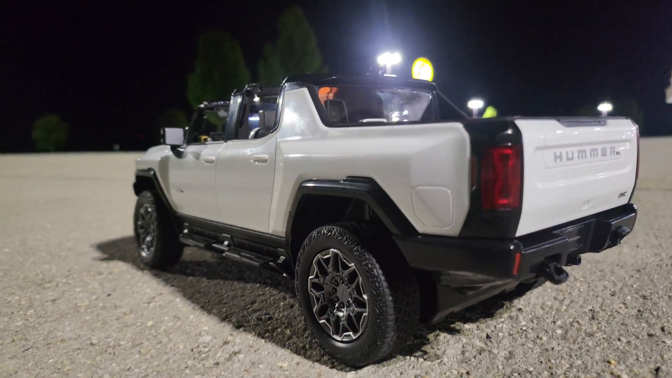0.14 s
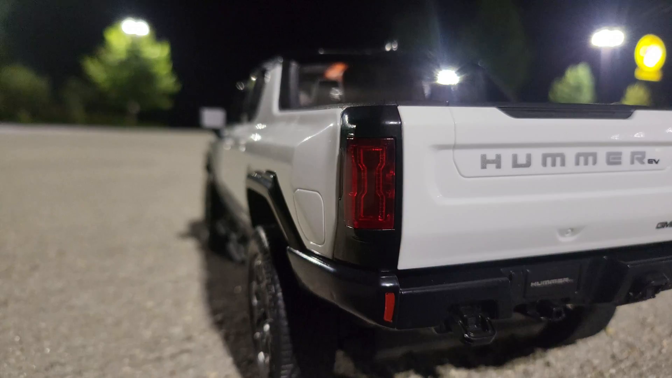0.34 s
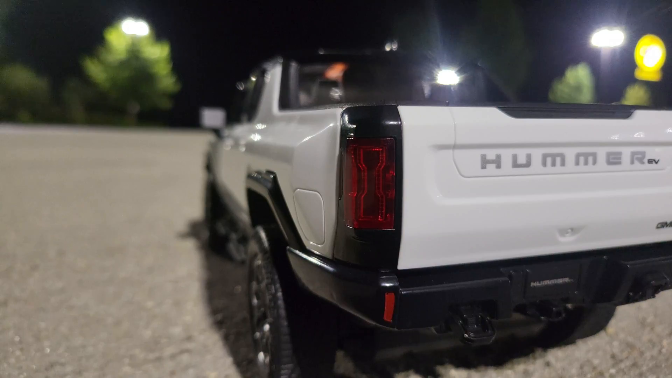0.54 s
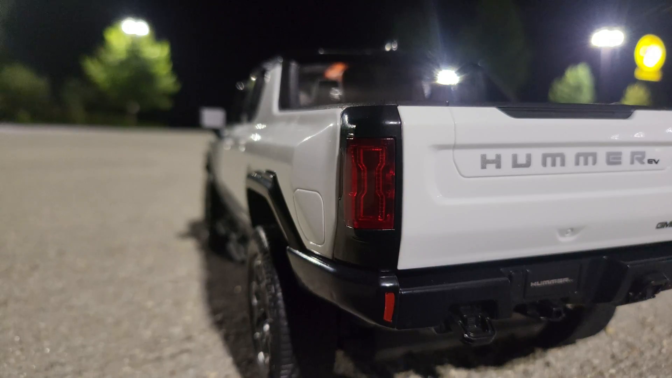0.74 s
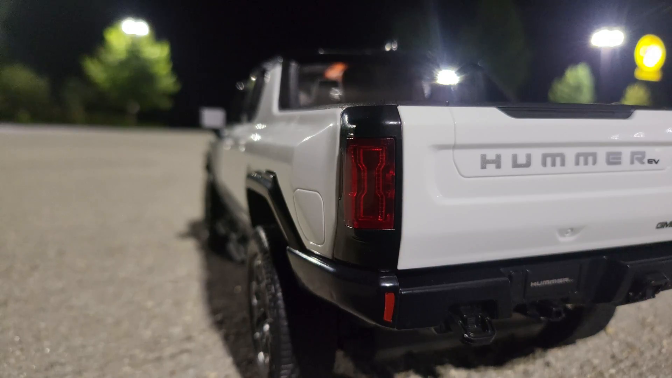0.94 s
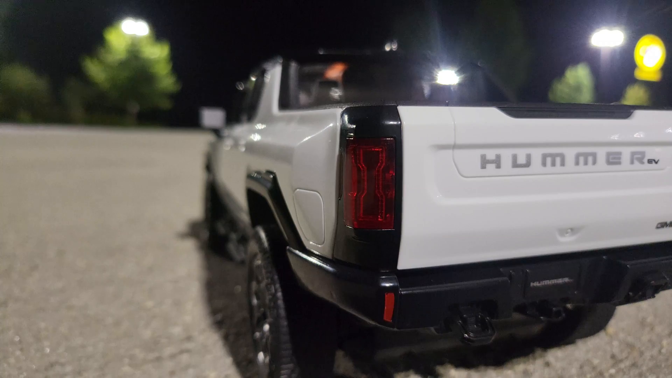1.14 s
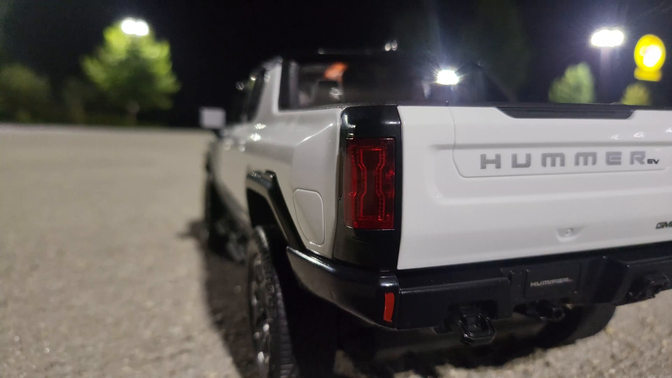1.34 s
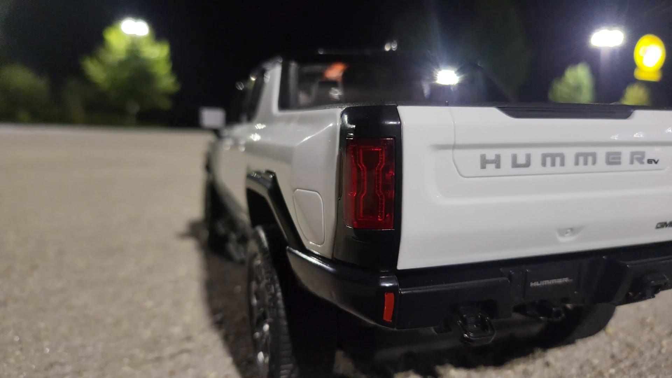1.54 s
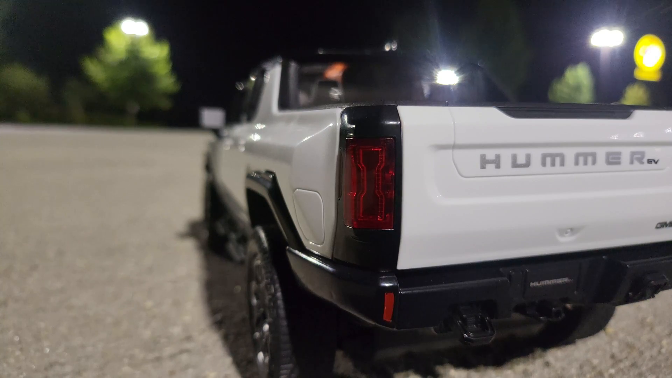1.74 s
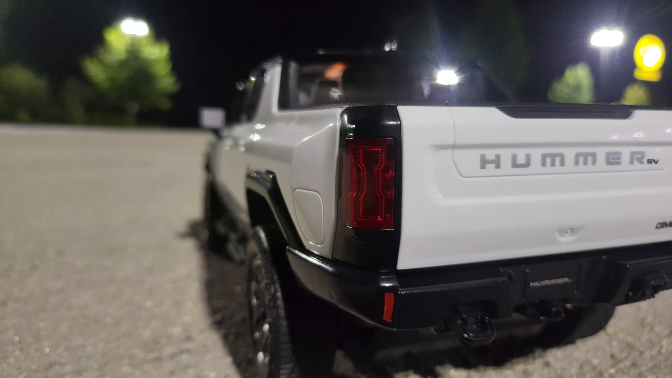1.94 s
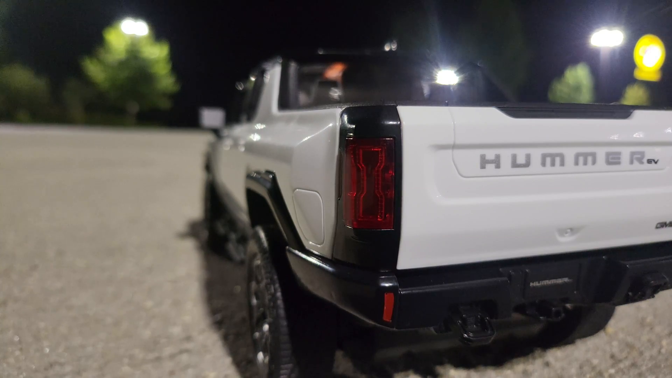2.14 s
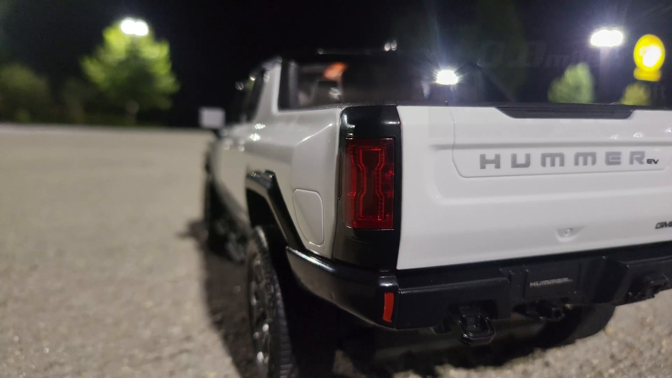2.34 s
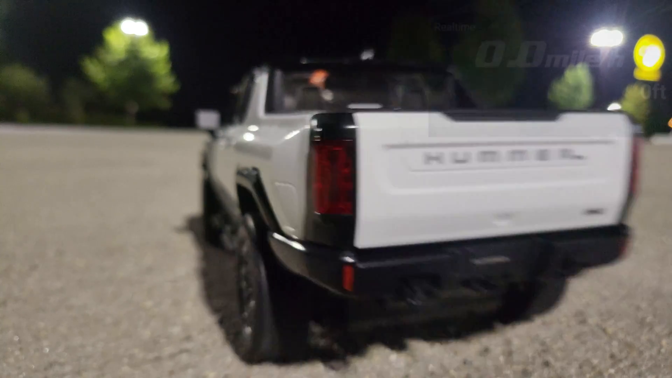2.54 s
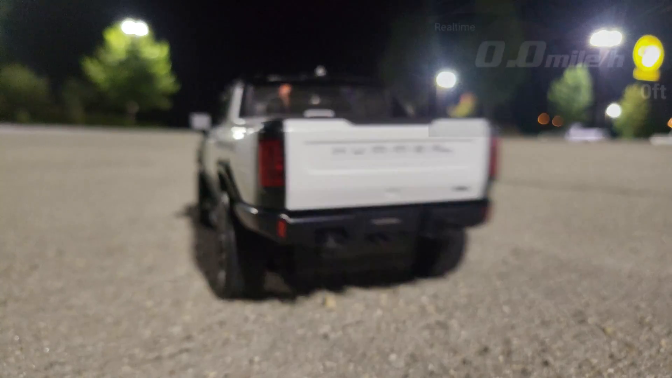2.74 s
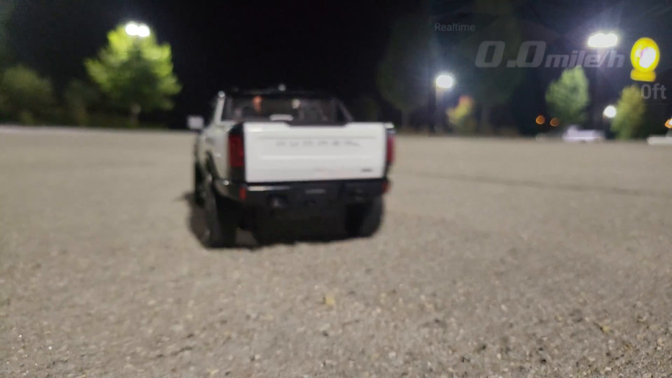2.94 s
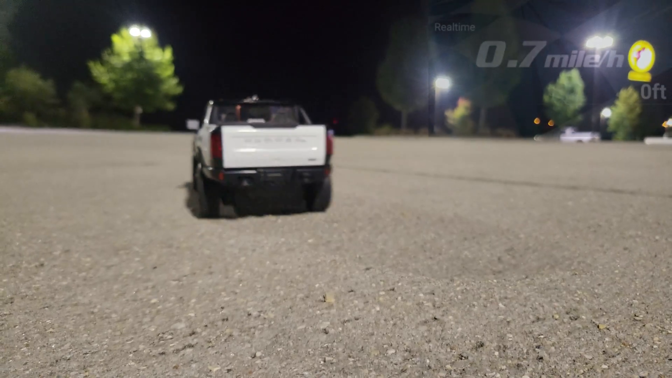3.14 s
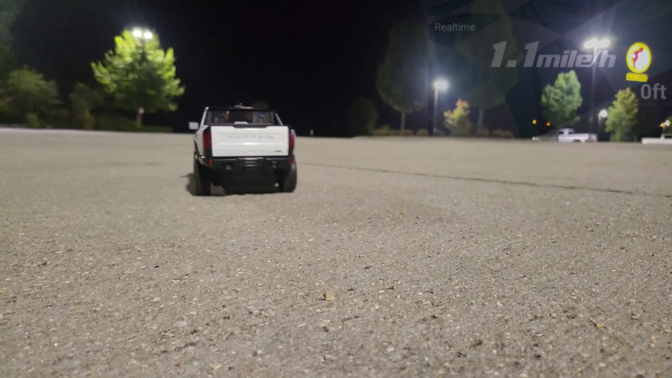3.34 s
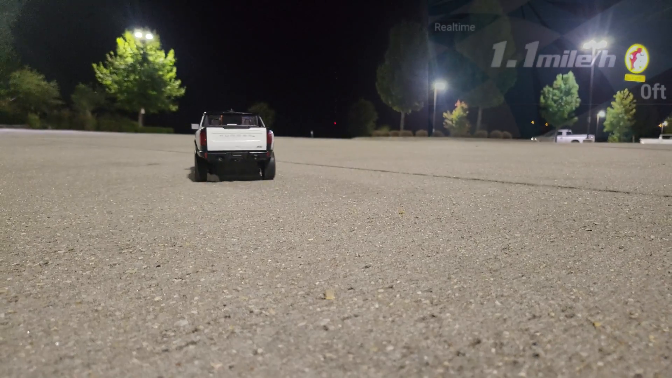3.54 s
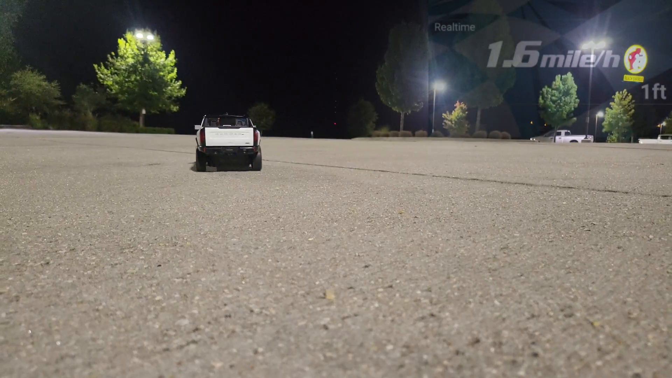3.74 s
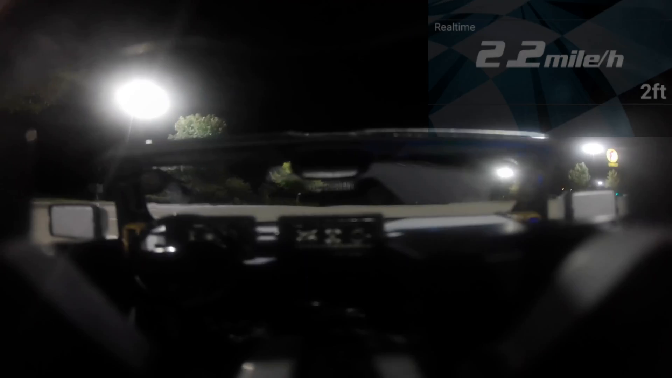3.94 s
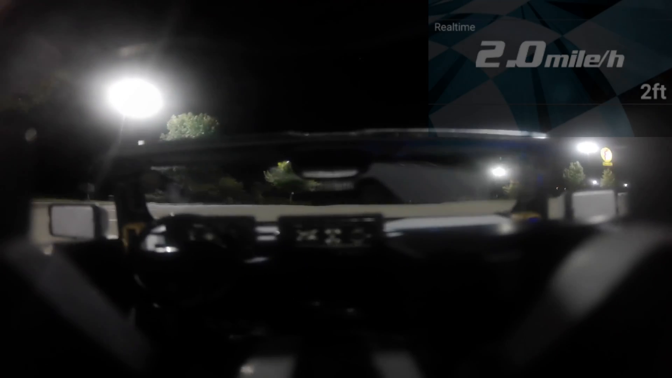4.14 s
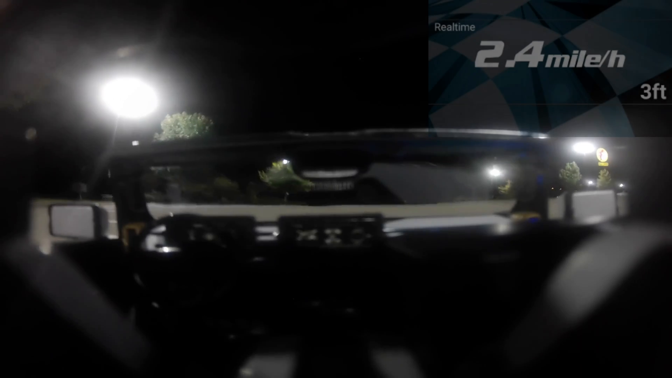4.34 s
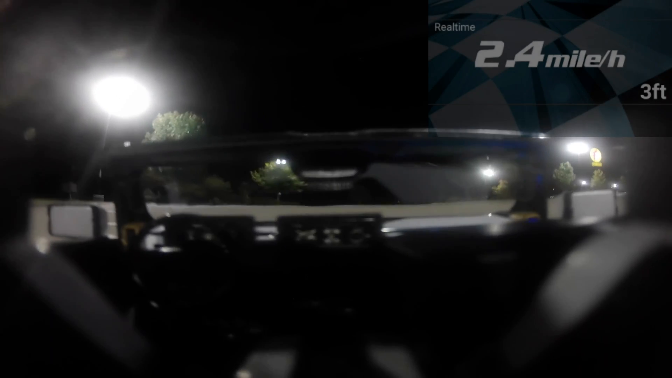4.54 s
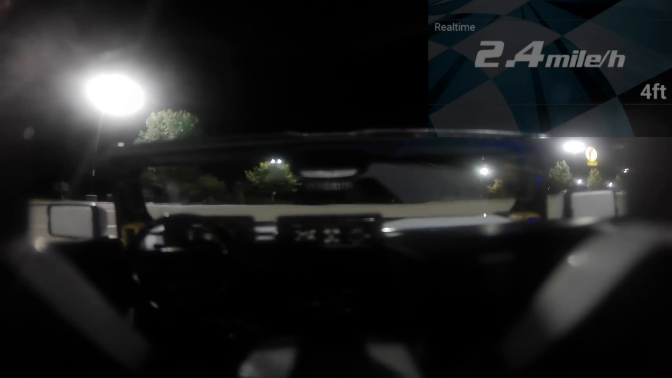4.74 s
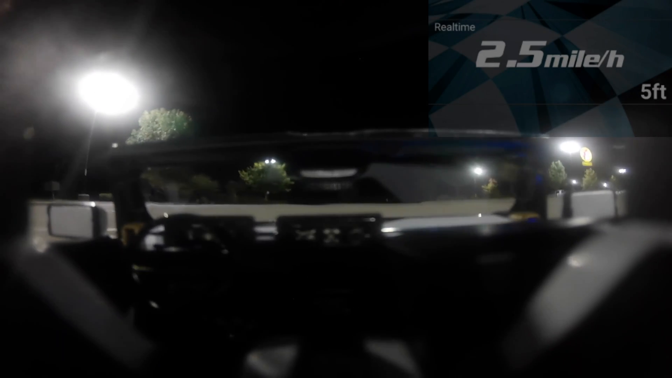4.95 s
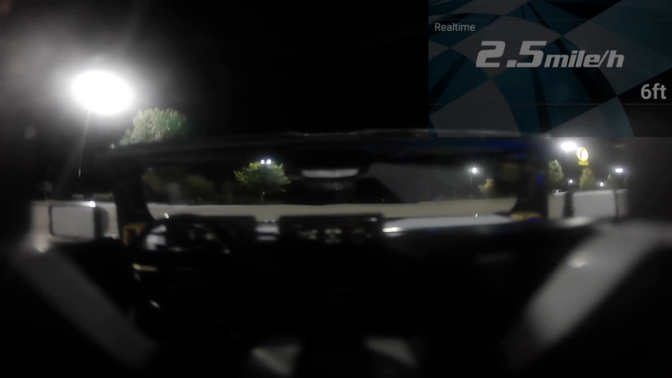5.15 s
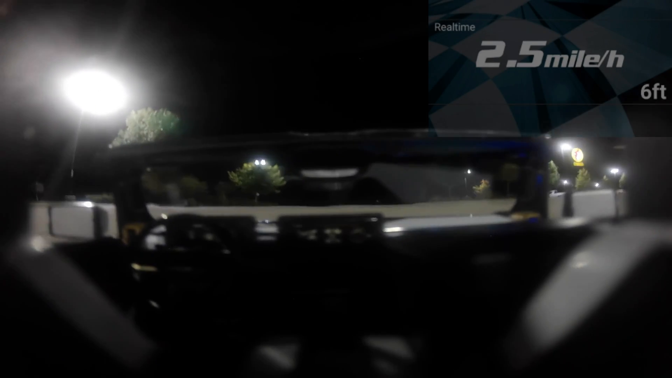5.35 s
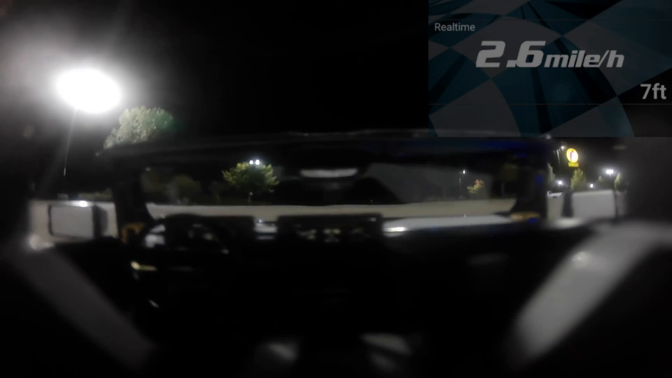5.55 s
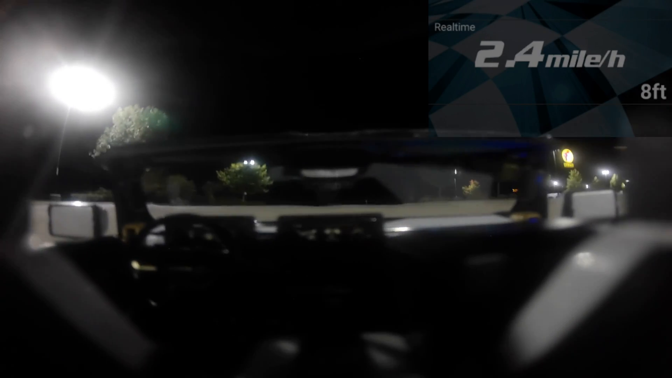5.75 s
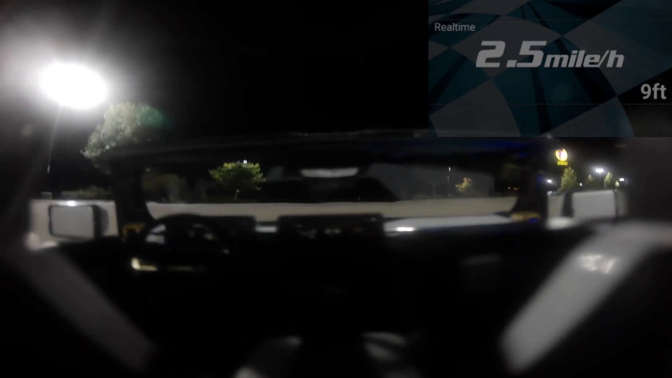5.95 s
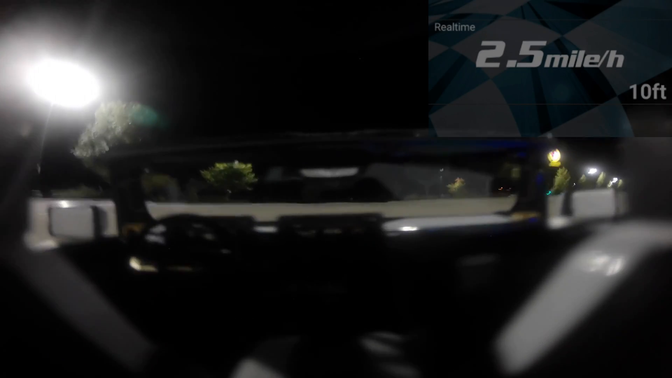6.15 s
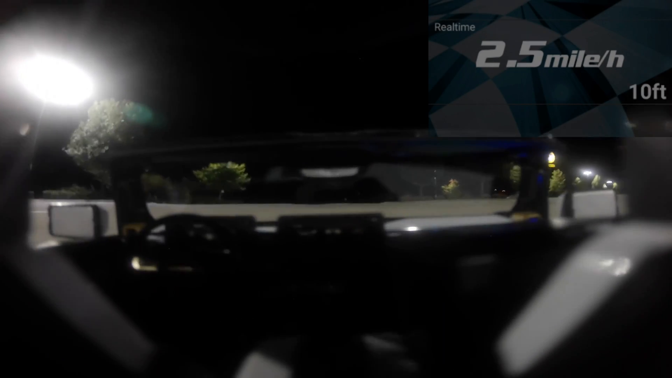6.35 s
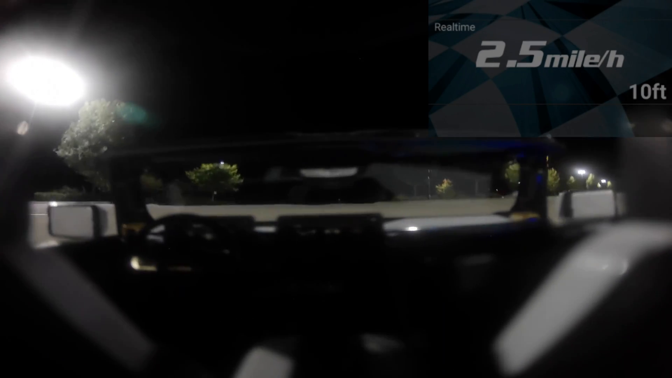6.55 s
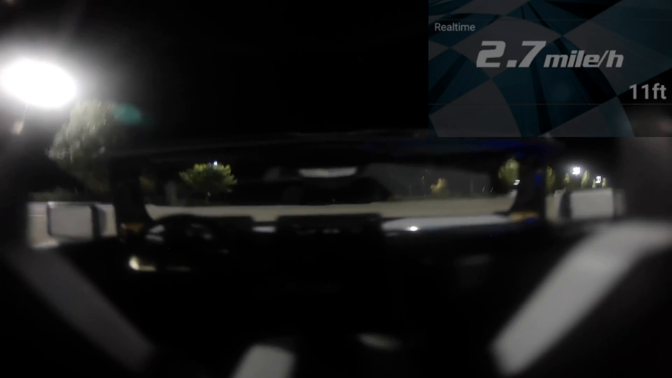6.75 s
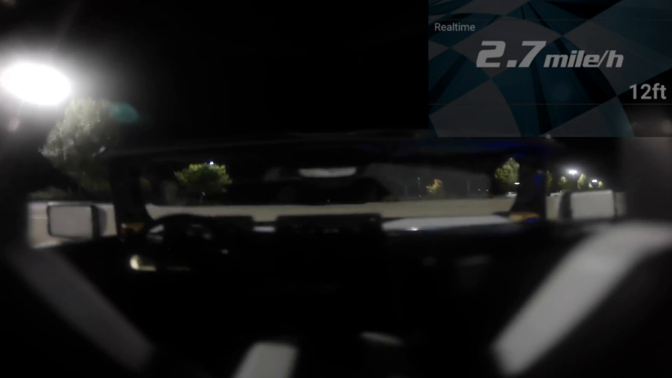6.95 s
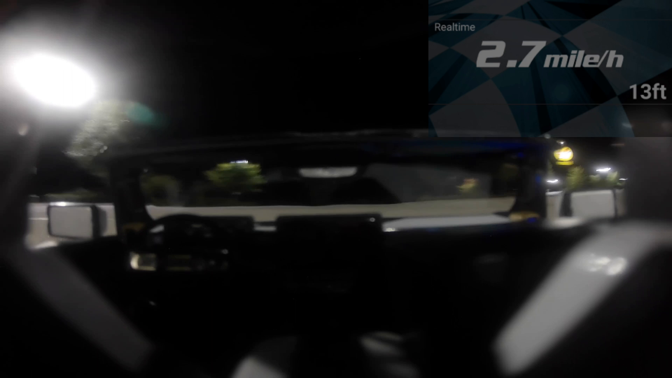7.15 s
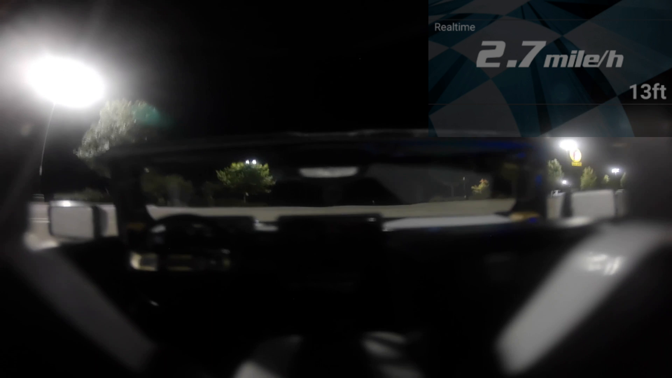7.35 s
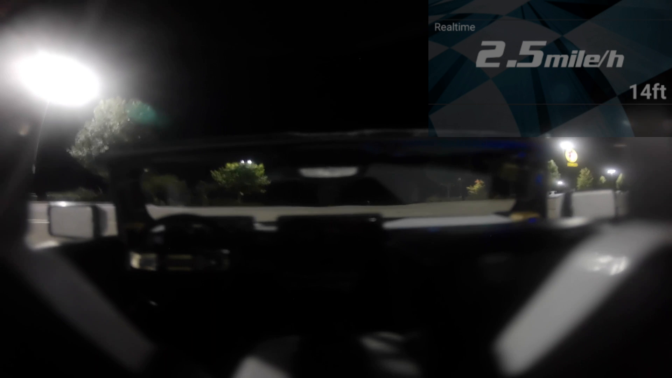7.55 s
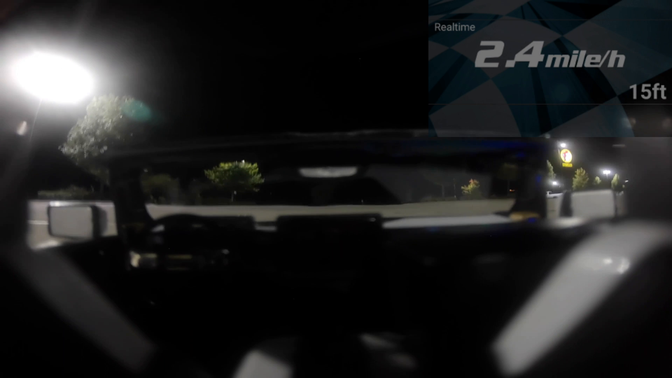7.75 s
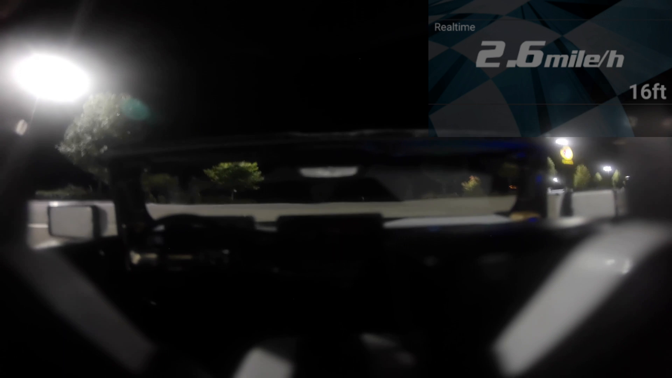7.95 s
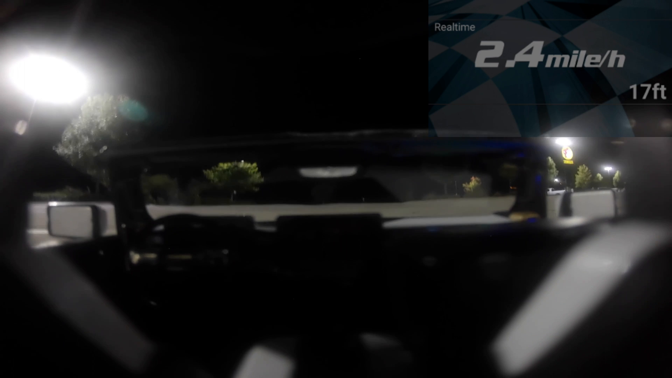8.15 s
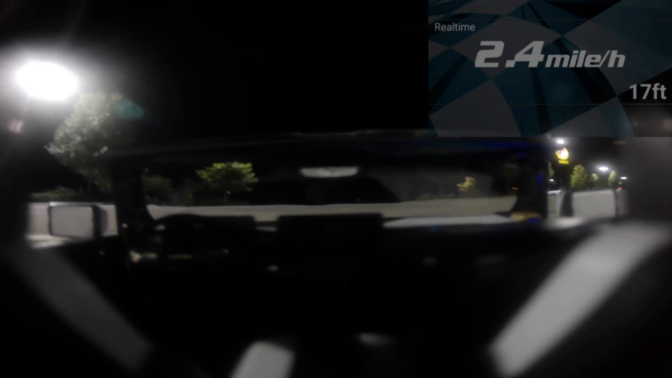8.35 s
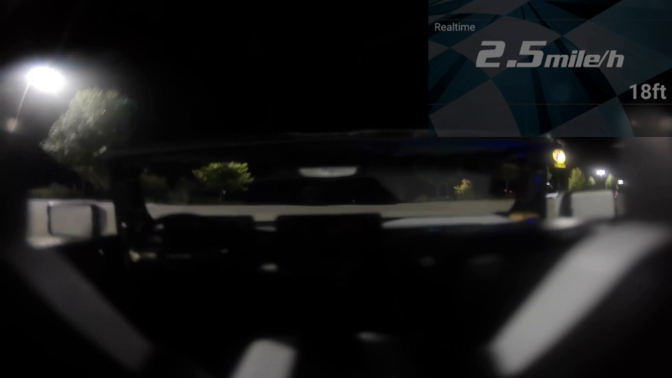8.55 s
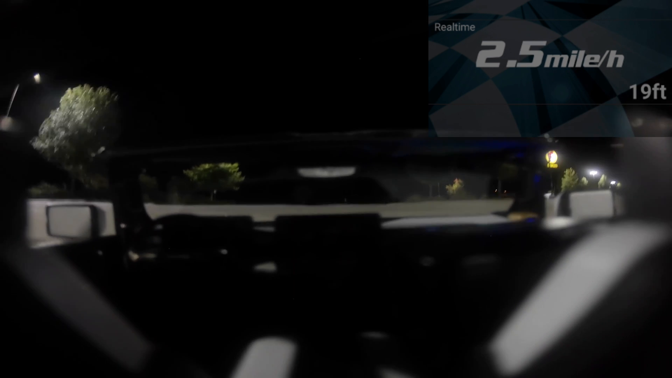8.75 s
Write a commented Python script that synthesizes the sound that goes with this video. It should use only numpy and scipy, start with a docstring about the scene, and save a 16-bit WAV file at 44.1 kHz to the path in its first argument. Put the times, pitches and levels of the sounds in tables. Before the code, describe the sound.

Quiet night lot hum, then a toy vehicle's electric motor starts with a clack, climbs quickly, and grinds along close up with snapping grit.

```python
"""On an empty asphalt lot at night, with a low hum and a faint hiss, a radio-controlled toy truck waits. First
comes a moment of other background sound, then a tiny silence, then the lot: shaped noise and steady tones. The
motor starts: gear tones, knocks and scraping noise ring through filters that act as the plastic body. The tyres
rumble as low noise and grit snaps as short noise puffs. Shaft speed sets the pitch of the gears and the level
of the gears and tyres. From 3.6 s the lot's hum and hiss fade away and the stereo image narrows."""
import sys
import numpy as np
from scipy.fft import rfft, irfft, next_fast_len
from scipy.io import wavfile
from scipy.ndimage import uniform_filter1d, map_coordinates

SR = 44100
rng = np.random.default_rng(int(sys.argv[2]) if len(sys.argv) > 2 else 0)


def wrap_up_sound(samples):
    """Save the sound to the file named by the first command line argument, as 16-bit audio."""
    columns = np.atleast_2d(samples).T
    # keep every value between -1 and 1, then stretch to whole-number steps
    tamed = np.clip(columns, -1, 1)
    steps = np.round(tamed * 32767).astype(np.int16)
    wavfile.write(sys.argv[1], SR, steps)


N = 392490
TIME = np.arange(N) / SR  # seconds

# Background of the opening moment. Each row: frequency in Hz, relative level in dB.
OPENING_SPECTRUM = [(25, -3.5), (200, -5), (300, -19), (1350, -19), (1700, -33.5), (7800, -43.5),
                    (8600, -80)]
# Low machine hum of the lot. Each row: frequency in Hz, relative level in dB.
LOT_HUM_SPECTRUM = [(12, -30), (20, -16), (54, -5), (78, -2.5), (92, -16.5), (129, -9), (210, -16.5),
                    (280, -26), (360, -61), (620, -120)]
# Faint hiss of the lot. Each row: frequency in Hz, relative level in dB.
LOT_HISS_SPECTRUM = [(150, -22), (280, 2), (500, 1.5), (900, -3.5), (1450, -10.5), (3100, -14),
                     (3700, -19.5), (4700, -21.5), (6000, -35.5), (7500, -37.5), (9000, -44), (15500, -34)]
# Steady tones in the hum. Each row: frequency in Hz, relative level in dB.
HUM_TONES = [(37.7, -42.5), (145.3, -49.5), (174.8, -53.5), (204.3, -46.5), (232.5, -51.5)]
# Two close tones that beat into a faint flutter. Each row: frequency in Hz, relative level in dB.
FLUTTER_TONES = [(1981, -62.5), (2040, -60.5)]
# Tyre rumble. Each row: frequency in Hz, relative level in dB.
TYRE_SPECTRUM = [(18, -42), (30, -6.5), (54, -11), (79, -3.5), (103, 1.5), (146, -3.5), (243, -1),
                 (346, -9.5), (550, -10.5), (720, -17.5), (1210, -120)]
# Coarse patches of asphalt. Each row: centre in seconds, half length in seconds, extra roughness in dB.
COARSE_PATCHES = [(3.77, 0.14, 0.5), (6.338, 0.21, 4.5), (7.453, 0.085, 3.5), (7.73, 0.086, 6.5),
                  (8.152, 0.18, 3.5)]
# Colour of a grit snap. Each row: frequency in Hz, relative level in dB.
GRIT_SPECTRUM = [(3000, -34), (5500, 1.5), (7300, 4), (9500, -4.5), (12000, -2), (13500, -11), (15500, -1),
                 (17000, -12.5)]
# Largest bits of grit that hit the body. Each row: start in seconds, relative peak in dB.
GRIT_SNAPS = [(3.0795, -11), (3.351, -10), (3.8663, -14), (4.1666, -10), (4.2694, -11), (4.5886, -8),
              (5.254, -6), (5.3514, -5), (6.2144, -7), (6.2992, -1), (6.4026, -3), (6.4927, -7.5),
              (6.607, -2), (6.9328, -10), (7.055, -5), (7.363, -8), (7.3935, -6.5), (7.4978, -7),
              (7.6819, -7), (8.659, -9)]
# Pebbles cracking as the wheels first bite. Each row: start in seconds, relative peak in dB.
PEBBLE_CRACKS = [(2.7238, -12), (2.7666, -17), (2.8713, -11), (2.8888, -7), (2.8995, -7), (2.9148, -1),
                 (3.154, -8.5)]
# Gears taking up their slack. Each row: start in seconds, relative peak in dB.
SLACK_CLACKS = [(2.437, -12.5), (2.46, -7.5), (2.486, -11)]
# Gear shaft speed. Each row: time in seconds, speed in turns per second.
SHAFT_SPEED = [(2.45, 6.0), (2.7, 16.0), (2.9, 21.7), (3.2, 27.0), (3.5, 30.3), (3.8, 32.8), (4.15, 36.2),
               (4.7, 37.7), (5.0, 38.1), (5.4, 37.9), (5.9, 39.4), (6.3, 39.2), (6.8, 38.1), (7.2, 38.2),
               (7.5, 38.3), (7.9, 38.5), (8.3, 37.6), (8.9, 38.1)]
# Gear tones. Each row: multiple of shaft speed, width in multiples, relative dB, extra dB at full torque.
GEAR_TONES = [(18, 2, -15, 0), (23.1, 1.4, 0, -4), (34.3, 2.1, -15, 16), (45.6, 4, -6, 13)]
# Off-centre gears press harder once a turn. Each row: multiple of shaft speed, relative depth in dB.
OFF_CENTRE_GEARS = [(.5, 1.2), (1, 1.8), (1.25, 1.1), (2.87, .7), (3, 1.3), (4, 1.0), (6, .7), (7, .8),
                    (11, .7)]
# Body shell resonances. Each row: frequency in Hz, width in Hz, relative level in dB.
SHELL_MODES = [(420, 110, -14), (729, 200, 1), (1042, 457, 2.5), (1330, 204, -1.5), (1980, 380, -19)]
# Gear housing resonances. Each row: frequency in Hz, width in Hz, relative level in dB.
HOUSING_MODES = [(2701, 532, -0.5), (3626, 260, -6.5), (4005, 885, -5), (5750, 420, -12), (6650, 2870, -14),
                 (11300, 7600, -29.5)]
# Thin metal rings of the motor. Each row: frequency in Hz, width in Hz, relative level in dB.
MOTOR_MODES = [(9950, 170, 6.5), (10370, 560, 3), (11740, 500, 5.5), (12400, 250, -19)]
# Axle resonances, for labouring at low speed. Each row: frequency in Hz, width in Hz, relative level in dB.
AXLE_MODES = [(980, 150, 0), (1270, 310, -6)]
# Wide stereo image at first. Each row: frequency in Hz, side level minus middle level in dB.
EARLY_WIDTH = [(60, -35), (180, -16), (550, -31.5), (1650, -10.5), (4970, -11.5), (15000, -8.5)]
# Narrow stereo image later on. Each row: frequency in Hz, side level minus middle level in dB.
LATE_WIDTH = [(60, -66), (130, -71), (290, -56), (640, -56), (1410, -66.5), (3100, -23), (6820, -13),
              (15000, -6)]

OPENING_END_S, LOT_START_S, DRIVE_START_S = .225, .248, 2.458
FADE_S, FADE_DB_PER_S = 3.6, 187  # when the lot and the wide stereo image start to fade, and how fast
HUM_DB, HISS_DB = -36, -42  # relative levels within the lot
CRUISE = 38  # shaft turns per second when cruising
# Layers of the drive: relative level at cruising speed in dB, growth in dB per doubling of speed
WHINE_DB, WHINE_GROWS_DB = -14.5, 7.5
RATTLE_DB, RATTLE_GROWS_DB = -17, 11
RUMBLE_DB, RUMBLE_GROWS_DB = -25, 3.5
GRIT_DB, GRIT_GROWS_DB = -30, 6
SLIDING_DB, SLIDING_GROWS_DB = 1, 0  # tooth friction relative to tooth strikes
# Gain in shaft speed, in turns per second each second, where torque sets in and where it is full
COAST_ACCEL, FULL_ACCEL = 4.5, 12.7
TORQUE_DB = 2.5  # the whine is this much louder at full torque
LABOUR_DB = 0  # axle ring relative to the gear knocks, at standstill and full torque
THROB_DB = 1.3  # swing of the gear tones, once a turn, ahead of the other level changes
BACKLASH = 0.29  # extra swing of tooth pressure at standstill, as a share of the cruising swing
SNAP_DB, KNOCK_DB = 5.5, 4.5  # gain of the large snaps; gain of the housing's knock in every grit hit
TOP_HZ = 15950  # upper band limit of the recorder


def amp(db):
    """Turn decibels into gain."""
    return 10 ** (np.asarray(db) / 20)


def unit(x):
    """Scale a signal to an average strength (rms) of 1."""
    return x / np.sqrt(np.mean(x ** 2) + 1e-20)


def wobble(rate):
    """Draw a smooth random curve of rms 1 with rate random points a second."""
    points = rng.standard_normal(int(N * rate / SR) + 4)
    return unit(map_coordinates(points, [TIME * rate]))


def along(points, hz):
    """Read (Hz, value) points on a logarithmic frequency axis."""
    f, v = np.transpose(points)
    return np.interp(np.log(hz + 1), np.log(f + 1), v)


def shape(points):
    """Turn a (Hz, dB) spectrum into a function giving gain at any frequency."""
    return lambda hz: amp(along(points, hz))


def resonances(modes):
    """Give the gain against frequency of a set of steep-sided resonances."""
    def gain(hz):
        peaks = (amp(db) / (1 + (2 * (hz - centre) / width) ** 2) for centre, width, db in modes)
        return np.sqrt(sum(peak ** 2 for peak in peaks))
    return gain


def ring(x, gain):
    """Pass x through a filter with this gain that responds only after each push."""
    m = 2 * next_fast_len(N // 2 + 8192)
    log_gain = np.log(np.maximum(gain(np.fft.rfftfreq(m, 1 / SR)), 1e-6))
    # Folding the cepstrum onto positive times gives the minimum-phase filter.
    cepstrum = irfft(log_gain)
    cepstrum[1:m // 2] *= 2
    cepstrum[m // 2 + 1:] = 0
    return irfft(rfft(x, m) * np.exp(rfft(cepstrum)), m)[:N]


def noise(points):
    """Make noise of rms 1 with a given spectrum."""
    return unit(ring(rng.standard_normal(N), shape(points)))


def bursts(rows, t60):
    """Place a noise puff for each (s, peak dB) row; it dies by 60 dB in t60 seconds."""
    out = np.zeros(N + SR)
    t = np.arange(SR // 10) / SR
    for start, db in rows:
        puff = rng.standard_normal(len(t)) * amp(-60 * t / t60)
        out[round(start * SR):][:len(t)] += amp(db) * puff / np.abs(puff).max()
    return out[:N]


def impacts(rate, scatter, spread_db):
    """Make pulses of random size and sign at a moving rate, scattered by a share of their period."""
    count = np.cumsum(rate) / SR
    k = np.arange(1, int(count[-1]))
    late, size, side = rng.standard_normal((N // 8, 3))[:len(k)].T
    at = np.interp(k + scatter * late, count, np.arange(N)).astype(int)
    pulse = np.sign(side) * amp(spread_db * np.clip(size, -2, 2))
    return np.bincount(at, pulse, N)


def ports(x, lag):
    """Let two close microphone ports hear the same sound, the left one lag seconds later."""
    m = next_fast_len(N + 8192)
    half = np.pi * np.fft.rfftfreq(m, 1 / SR) * lag
    return irfft(rfft(x, m) * np.exp(1j * np.array([-half, half])), m)[:, :N]


def ambient(points, direct):
    """Mix noise from the right (direct is its share of power) with noise from all around."""
    share = np.clip(direct, 0, .7)
    around = np.array([noise(points), noise(points)])
    from_right = ports(noise(points), lag=0.000394)
    return np.sqrt(share) * from_right + np.sqrt(1 - share) * around


def opening():
    """Play a short stretch of background noise that stops at once."""
    return amp(-31.0) * ambient(OPENING_SPECTRUM, direct=0.42) * (TIME < OPENING_END_S)


def early_share():
    """Give the gain of the early part: 1 at first, then fading fast after 3.6 s."""
    return amp(-FADE_DB_PER_S * np.maximum(TIME - FADE_S, 0))


def steady_tone(hz, db):
    """Sound a hum tone whose level and phase waver slightly."""
    level = amp(db + 0.67 * wobble(5.02)) * np.sqrt(2)
    return level * np.sin(2 * np.pi * hz * TIME + .5 * wobble(6.3))


def lot():
    """Mix machine hum, its tones and a faint hiss; all fade out after 3.6 s."""
    tones = sum(steady_tone(hz, db) for hz, db in HUM_TONES + FLUTTER_TONES)
    hum = amp(HUM_DB) * noise(LOT_HUM_SPECTRUM) + tones
    hiss = amp(HISS_DB) * ambient(LOT_HISS_SPECTRUM, direct=0.57)
    return amp(3) * early_share() * (ports(hum, lag=.0001) + hiss)


def speed_db(speed, grows_db):
    """Give the level relative to cruising: grows_db for each doubling of speed."""
    return grows_db * np.log2(speed / CRUISE)


def coarseness():
    """Give the extra roughness in dB as the wheels roll onto each coarse patch and off again."""
    return sum(db * np.exp(-((TIME - s) / half) ** 2) for s, half, db in COARSE_PATCHES)


def grit_hits(rows):
    """Let each (s, dB) bit of grit snap against the body and knock the housing."""
    snaps = ring(bursts(rows, t60=0.017), shape(GRIT_SPECTRUM))
    knocks = ring(bursts(rows, t60=0.045), resonances(HOUSING_MODES))
    return snaps + amp(KNOCK_DB) * knocks


def tyres(speed):
    """Rumble the tread over asphalt and throw up small grit, both louder on coarse ground."""
    coarse_db = coarseness()
    rumble_db = RUMBLE_DB + speed_db(speed, RUMBLE_GROWS_DB) + coarse_db + 1.1 * wobble(25)
    grit_db = GRIT_DB + speed_db(speed, GRIT_GROWS_DB) + 1.06 * coarse_db
    when, size = rng.random(size=(900, 2)).T
    ticks = np.column_stack([when * N / SR, -24 * np.sqrt(size)])  # many small, few large
    return amp(rumble_db) * noise(TYRE_SPECTRUM) + amp(grit_db) * unit(grit_hits(ticks))


def stones():
    """Fling larger grit at the body and crack pebbles under the wheels."""
    crack_shape = shape([(1500, -18), (4000, 0), (8000, 1.0), (16000, -2)])
    cracks = ring(bursts(PEBBLE_CRACKS, t60=0.0052), crack_shape)
    return amp(SNAP_DB) * grit_hits(GRIT_SNAPS) + amp(4.5) * cracks


def slack_clacks():
    """Clack the gears together as they take up their slack."""
    clack_shape = shape([(200, -21), (1300, 10.0), (2500, 0.0), (5000, -4.5), (8000, -25)])
    return amp(1.5) * ring(bursts(SLACK_CLACKS, t60=0.099), clack_shape)


def motor_torque(speed):
    """Give torque from 0 to 1, high while the truck gathers speed."""
    accel = uniform_filter1d(np.gradient(speed) * SR, size=SR // 3)
    return np.clip((accel - COAST_ACCEL) / (FULL_ACCEL - COAST_ACCEL), 0, 1)


def tooth_load(speed):
    """Swing the tooth pressure as gears turn, the other gears at random angles to the shaft."""
    turns = np.cumsum(speed) / SR
    return sum(db * np.cos(2 * np.pi * (k * turns + rng.random() * (k != 1)))
               for k, db in OFF_CENTRE_GEARS)


def fuzzy_tone(turns, multiple, width):
    """Lock a tone to the shaft while its strength and phase wander from turn to turn."""
    a, b = (map_coordinates(knots, [turns * 2 * width]) for knots in rng.standard_normal((2, 4096)))
    angle = 2 * np.pi * multiple * turns
    return a * np.cos(angle) + b * np.sin(angle)


def whine(speed, torque, load_db):
    """Ring gear tones and knocks in the shell; torque changes the tones and rings the axle."""
    turns = np.cumsum(speed) / SR
    throb = amp(THROB_DB * np.cos(2 * np.pi * turns))
    mesh = sum(amp(db + extra_db * torque) * fuzzy_tone(turns, k, width)
               for k, width, db, extra_db in GEAR_TONES)
    tones = throb * speed ** 2 * mesh
    knocks = impacts(69 * speed, scatter=1.5, spread_db=2) / np.sqrt(speed)
    labour = torque * np.maximum(1 - speed / CRUISE, 0)
    axle = amp(LABOUR_DB) * labour * unit(ring(rng.standard_normal(N), resonances(AXLE_MODES)))
    shell = resonances(SHELL_MODES)
    sound = amp(-3.4) * unit(ring(tones, shell)) + unit(ring(knocks, shell)) + axle
    return unit(sound * amp(.68 * load_db))


def rattle(speed, load_db):
    """Strike and slide the teeth to ring the housing; at speed the motor's metal sings too."""
    strikes = unit(impacts(23 * speed, scatter=.5, spread_db=2.5) / np.sqrt(speed))
    sliding = amp(SLIDING_DB + speed_db(speed, SLIDING_GROWS_DB)) * rng.standard_normal(N)
    force = (strikes + sliding) * amp(.75 * load_db)
    singing = amp(-19) * (speed / speed.max()) ** 2 * unit(ring(force, resonances(MOTOR_MODES)))
    return unit(ring(force, resonances(HOUSING_MODES))) + singing


def gearbox(speed):
    """Whine and rattle louder with speed and on coarse ground; slow gears swing more in level."""
    torque, coarse_db = motor_torque(speed), coarseness()
    load_db = tooth_load(speed) * (1 + BACKLASH * (1 - speed / CRUISE))
    whine_db = WHINE_DB + speed_db(speed, WHINE_GROWS_DB) + TORQUE_DB * torque + 0.17 * coarse_db
    rattle_db = RATTLE_DB + speed_db(speed, RATTLE_GROWS_DB) + 0.17 * coarse_db + 0.43 * wobble(8)
    return amp(whine_db) * whine(speed, torque, load_db) + amp(rattle_db) * rattle(speed, load_db)


def spread(x):
    """Add a slightly late copy, opposite in the two channels; the image narrows after 3.6 s."""
    late, share = np.roll(x, SR // 700), early_share()
    side = share * ring(late, shape(EARLY_WIDTH)) + (1 - share) * ring(late, shape(LATE_WIDTH))
    return np.array([x + side, x - side])


def scene():
    """Play the opening, a tiny silence, then the lot where the truck waits and drives off."""
    times, turns_per_s = np.transpose(SHAFT_SPEED)
    speed = np.interp(TIME, times, turns_per_s)
    driving = (gearbox(speed) + tyres(speed)) * (TIME > DRIVE_START_S)
    truck = slack_clacks() + driving + stones()
    return opening() + lot() * (TIME > LOT_START_S) + spread(truck)


def record(dry):
    """Round off the highest peaks as the recorder does, and drop all above its band limit."""
    held = dry / (1 + np.abs(dry) ** 8) ** (1 / 8)
    m = next_fast_len(N + 8192)
    in_band = np.fft.rfftfreq(m, 1 / SR) < TOP_HZ
    return irfft(rfft(held, m) * in_band, m)[:, :N]


dry = scene()
out = record(dry)
wrap_up_sound(out)
```